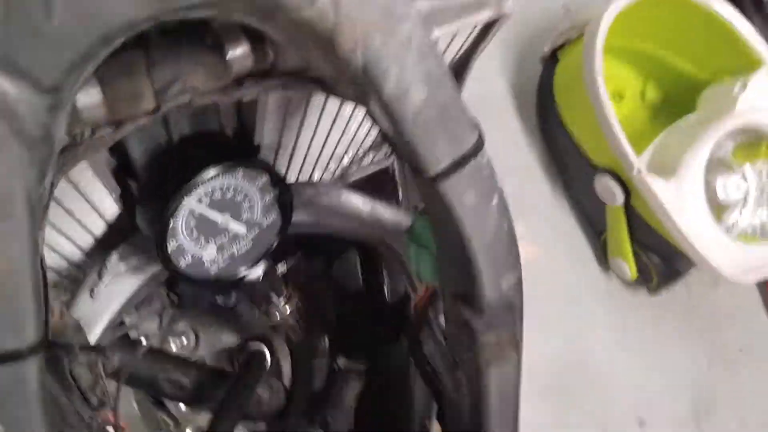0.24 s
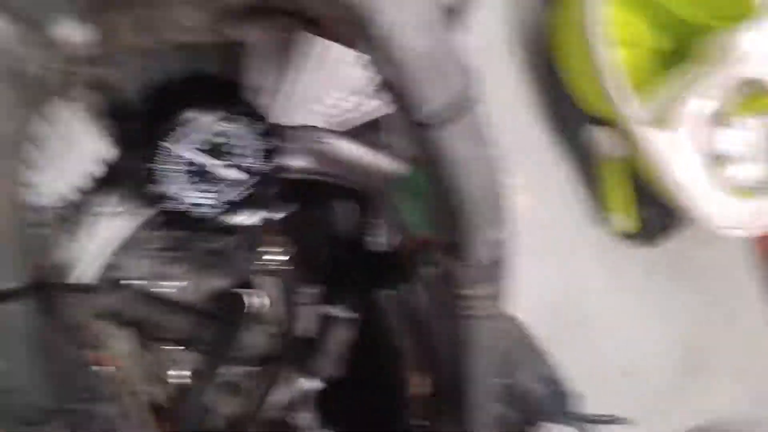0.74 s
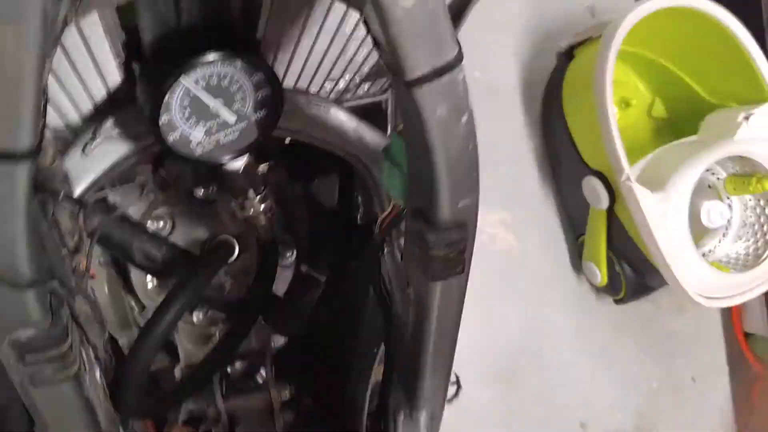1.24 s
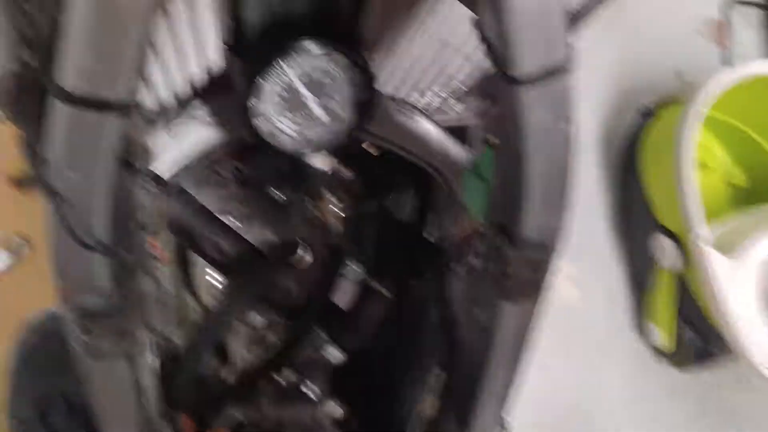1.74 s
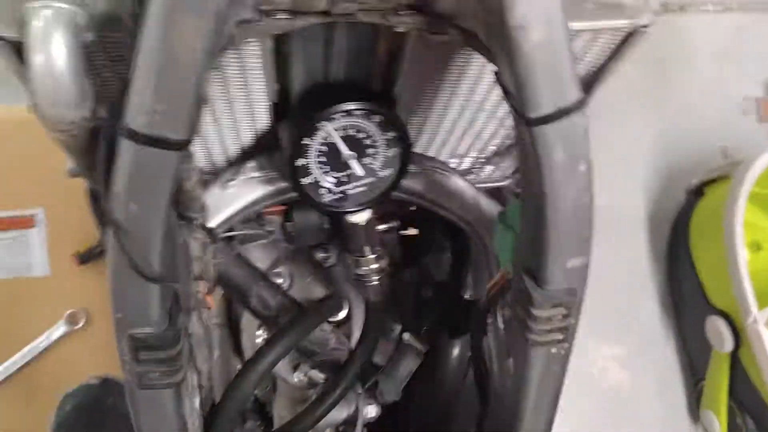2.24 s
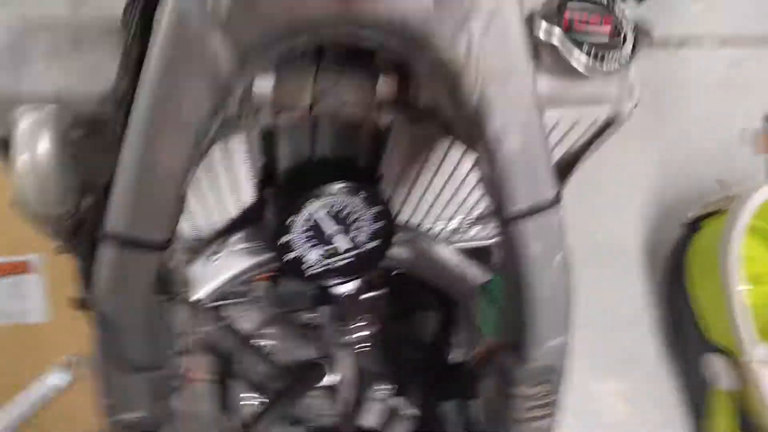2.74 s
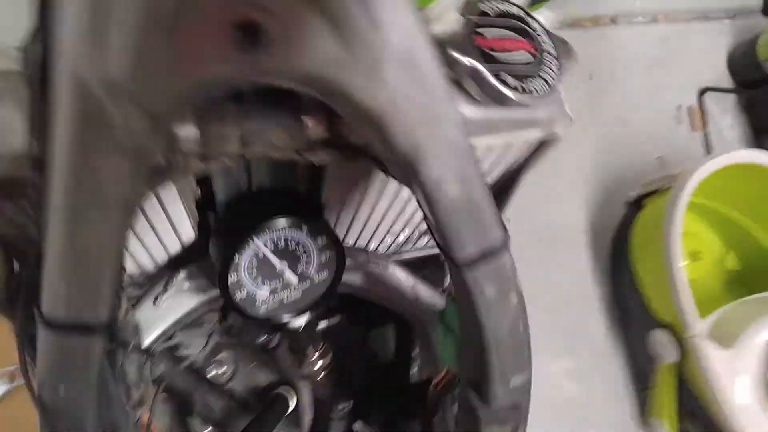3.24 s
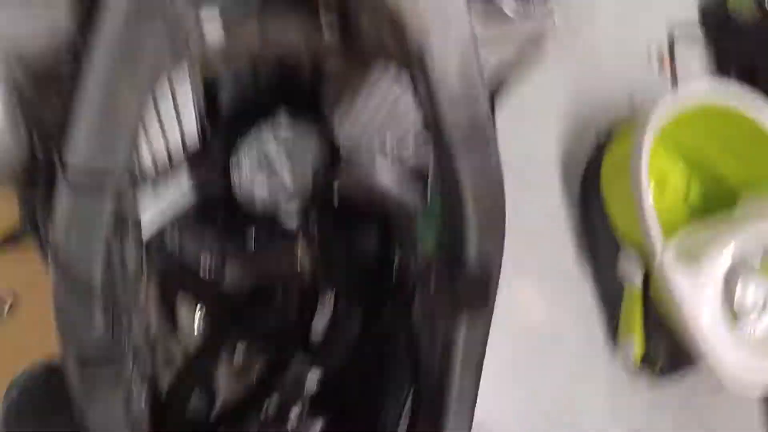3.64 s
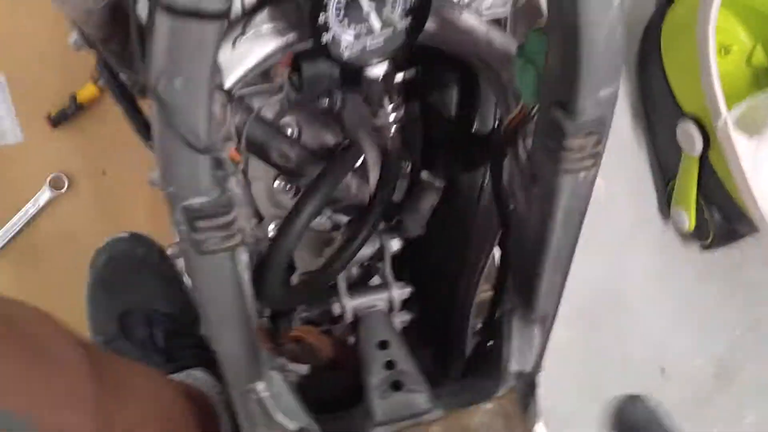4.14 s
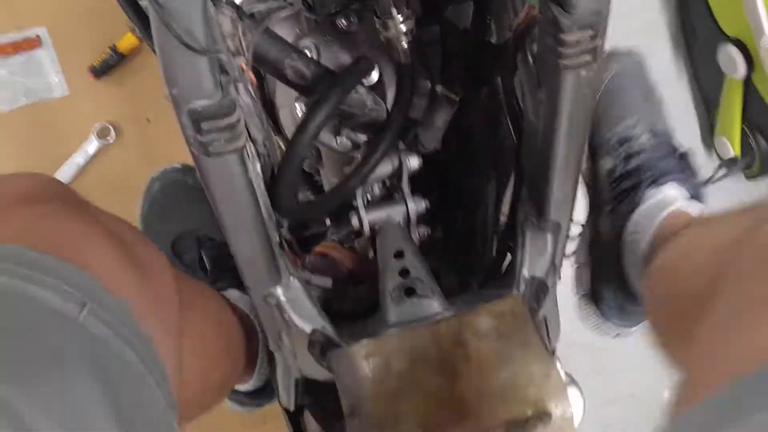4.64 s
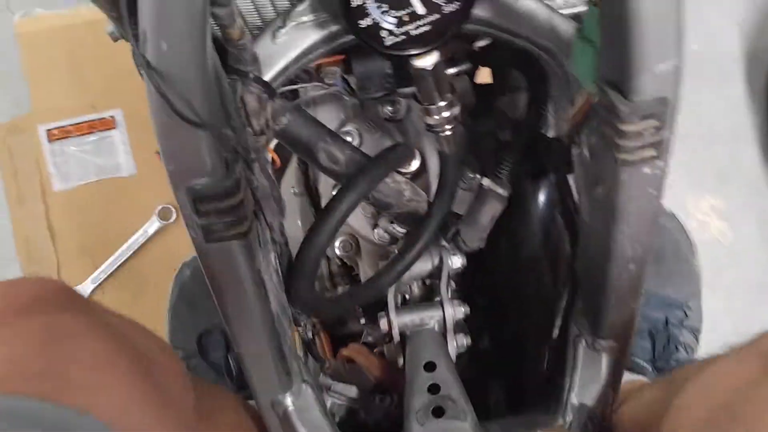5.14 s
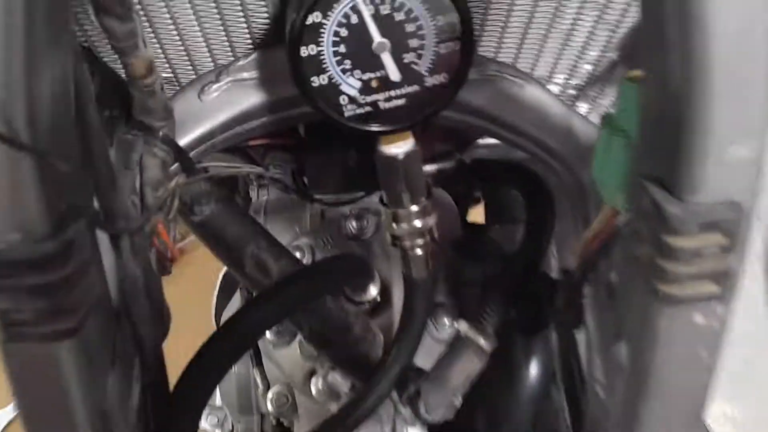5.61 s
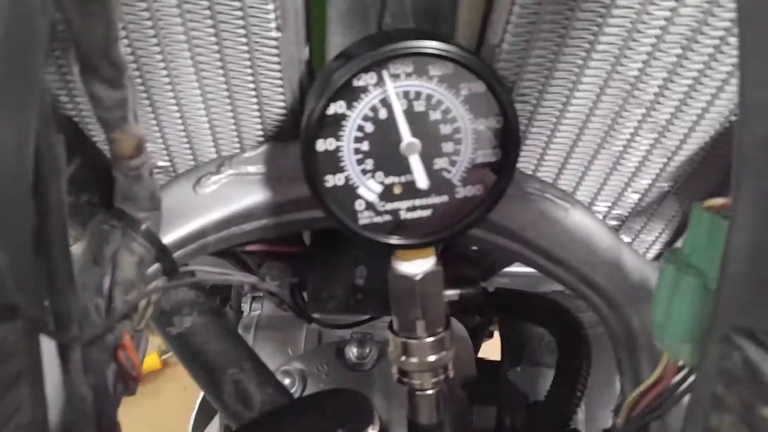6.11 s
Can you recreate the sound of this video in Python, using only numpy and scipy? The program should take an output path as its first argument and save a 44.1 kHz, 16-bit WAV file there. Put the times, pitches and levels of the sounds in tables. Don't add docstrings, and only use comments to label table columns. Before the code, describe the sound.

Close above a motorcycle engine in a hard, echoing garage, a kick lever is stamped seven times at a steady pace. Each stroke brings a gritty gear whirr, alloy knocks, quick hollow puffs from the exhaust and a bright steel clank, then ratcheting as the lever swings back. The engine never catches. Afterwards rubber soles thud, scuff and squeak, and the room falls nearly silent with a few tiny clicks.

```python
import sys
import numpy as np
from scipy import signal
from scipy.fft import rfft, irfft, next_fast_len
from scipy.io import wavfile
from scipy.ndimage import uniform_filter1d, minimum_filter1d

SR = 44100
rng = np.random.default_rng(int(sys.argv[2]) if len(sys.argv) > 2 else 0)


def how_loud(loudness_db):
    steps = np.asarray(loudness_db, float) / 20
    return 10 ** steps


def materialize(psi):
    bounded = np.clip(np.atleast_2d(psi).T, -1, 1)
    quanta = np.round(bounded * 32767).astype(np.int16)
    wavfile.write(sys.argv[1], SR, quanta)


N = 280917
SIZE = next_fast_len(N + 2 * SR)
HZ = np.maximum(np.arange(SIZE // 2 + 1) * SR / SIZE, 1)
TIME = np.arange(N) / SR
BLOW_TIME = np.arange(int(.3 * SR)) / SR


def on_hz(table, hz=HZ):
    f, v = np.transpose(table)
    return np.interp(np.log(hz), np.log(f), v)


def on_time(table):
    s, *columns = np.transpose(table)
    return [np.interp(TIME, s, c) for c in columns]


def unit(x):
    return x / np.sqrt(np.mean(x ** 2))


def band(x, lo_hz, hi_hz):
    return signal.sosfilt(signal.butter(2, [lo_hz, hi_hz], "bandpass", fs=SR, output="sos"), x)


def noise():
    return rng.standard_normal(N)


def walk(rate):
    k = int(SR / rate)
    held = np.repeat(rng.standard_normal(N // k + 1), k)
    return 1.43 * uniform_filter1d(uniform_filter1d(held, k), k)[:N]


def peak(s, db, rise_db_s, fall_db_s):
    t = TIME - s
    return db - np.maximum(-rise_db_s * t, fall_db_s * t)


def ring(modes, chance, push_s, detune, scatter_db, skew, turn=np.pi):
    hz, db, t60 = np.transpose(modes)[:, :, None]
    t = BLOW_TIME
    a, b, c = chance[:3 * len(modes)].reshape(3, -1, 1)
    phase = turn * np.arange(len(modes))[:, None] + skew * c
    waves = how_loud(db + scatter_db * a) * np.sin(2 * np.pi * hz * (1 + detune * b) * t + phase)
    decay = np.exp(-np.log(1000) * t / t60)
    y = np.sum(waves * decay, axis=0) * np.minimum(t / push_s, 1)
    return y / np.abs(y).max()


def add(out, s, sound):
    i = int(s * SR)
    out[..., i:i + sound.shape[-1]] += sound[..., :N - i]


def causal(db):
    cep = irfft(np.log(how_loud(db)), SIZE)
    cep[1:SIZE // 2] *= 2
    cep[SIZE // 2 + 1:] = 0
    return np.exp(rfft(cep))


# f/Hz, coherence/1
ALIKE = [(60, 1), (130, 0.97), (290, 0.97), (640, 0.81), (1410, 0.4), (3100, 0.5), (6820, 0.05),
         (15000, 0.4)]


def ports(a, b):
    c = np.clip(on_hz(ALIKE), 0, 1)
    mid, side = np.sqrt(1 + c) * a, np.sqrt(1 - c) * b
    return np.array([mid + side, mid - side]) / 2


# f/Hz, level/dB
LEAN = [(60, 0), (110, 1), (200, 1), (380, 2), (700, 1.5), (1290, 6.5), (2380, 2.2), (4400, 5.3),
        (8120, 3.5), (15000, -0.5)]
# f/Hz, phase/rad
LEAD = [(100, -0.18), (1030, 0.39), (2760, 0.66), (4700, 1.3), (5500, 1.5), (6300, -1.8), (8870, 2.26),
        (10100, 1.5), (16000, 0.99)]


def port_sides():
    lean = how_loud(on_hz(LEAN) / 2) * np.exp(1j * on_hz(LEAD) / 2)
    return np.array([lean, 1 / lean])


# f/Hz, spectral density/dB
FLOOR_TONE = [(15, -47.5), (30, -22), (64, -16.5), (128, -15), (230, -17.5), (400, -29.5), (510, -57),
              (691, -21), (9020, -51.5), (15000, -47)]


def room_tone():
    diffuse = ports(*rfft(rng.standard_normal((2, SIZE))))
    tone = irfft(port_sides() * diffuse * how_loud(on_hz(FLOOR_TONE)), SIZE)[:, :N]
    return unit(tone) * how_loud(-63.5)


def mains_hum():
    return how_loud(-70.0) * np.sin(2 * np.pi * 120 * TIME) + how_loud(-63.5) * np.sin(2 * np.pi * 60 * TIME)


# f/Hz, T60/s
GARAGE_T60 = [(60, 0.54), (250, 0.84), (700, 0.81), (2000, 0.52), (5000, 0.77), (12000, 0.52)]
# f/Hz, level/dB
GARAGE_DB = [(60, -14.5), (250, -4.5), (700, -2.5), (2000, -5.5), (5000, -3), (12000, -10.5)]


def garage():
    t, tails = np.arange(int(1.4 * SR)) / SR, 0
    for hz in 45 * 2. ** np.arange(9):
        lo_hz, hi_hz = hz / 1.4, hz * 1.4
        tail = band(rng.standard_normal((2, len(t))), lo_hz, hi_hz)
        decay = np.exp(-np.log(1000) * t / on_hz(GARAGE_T60, hz))
        tail *= decay * np.clip((t - .004) / 0.023, 0, 1)
        width = np.sum(band(np.eye(1, 4096)[0], lo_hz, hi_hz) ** 2)
        energy = np.sum(tail ** 2, axis=1, keepdims=True)
        tails = tails + tail * how_loud(on_hz(GARAGE_DB, hz)) * np.sqrt(width / energy)
    frame = rng.standard_normal((2, 2048)) * np.exp(-t[:2048] / .005)
    frame = rfft(frame / np.sqrt(np.sum(frame ** 2, axis=1, keepdims=True)), SIZE)
    apart = np.sqrt(1 - np.clip(on_hz(ALIKE), 0, 1))
    return ports(*rfft(tails, SIZE)) + how_loud(-5.0) * apart * frame


# pawl engages t/s, lever meets stop t/s, blow level/dB, pumped air level/dB, rubbing before it level/dB
KICKS = [
    (-0.05, 0.1037, 2, -14.5, -44),
    (0.606, 0.7511, 3.5, -27, -45),
    (1.29, 1.4942, -2, -21.5, -51.5),
    (1.925, 2.1183, 2.5, -18, -48.5),
    (2.59, 2.77, -0.5, -16.5, -45),
    (3.208, 3.3834, 5.5, -12.5, -41.5),
    (3.826, 4.0393, 2, -17, -48),
]


def pumping():
    lines = []
    for s, stop, _, db, _ in KICKS:
        top_s = stop + 0.014
        lines.append(peak(top_s, db, 22.5 / (top_s - s), 66.5))
    lines.append(peak(5.1, -43, 340, 99))
    return np.max(lines, axis=0)


def hand_shake():
    level_db = pumping()
    shake = unit(band(rng.standard_normal((2, N)), 25, 60)) * how_loud(level_db - 31.5)
    return shake * (level_db > -60)


# t/s, peak level/dB, f/Hz, T60/s
STEPS = [
    (4.428, -42, 132.2, 0.43),
    (4.82, -26.5, 707, 0.1),
    (5.061, -27.5, 328, 0.033),
    (5.471, -44, 299.5, 0.074),
    (6.3, -42, 5540, 0.04),
    (6.32, -49, 224, 0.059),
    (6.323, -47.5, 5570, 0.048),
    (6.353, -43, 339, 0.077),
    (6.356, -43, 5500, 0.072),
]


def footsteps():
    out = np.zeros(N)
    for s, db, hz, t60 in STEPS:
        modes = [(hz, 0, t60), (1.09 * hz, -3, t60)]
        add(out, s, how_loud(db) * ring(modes, rng.standard_normal(12), .9 / hz, .01, 1.5, 1.5))
    return out


# start t/s, end t/s, f/Hz, level/dB, second partial ratio/1, second partial level/dB
SQUEAKS = [
    (4.63, 4.88, 2195, -46.5, 1.2, -4),
    (5.00, 5.07, 1650, -41, 2.0, -8),
    (5.08, 5.28, 2250, -44, 1.17, -3),
    (5.11, 5.2, 2050, -49, 1.6, -3),
    (5.22, 5.32, 3440, -51, .76, -1),
    (5.36, 5.42, 1060, -49, 2.0, -8),
    (5.07, 5.17, 3760, -50, .55, 0),
    (5.58, 5.69, 1250, -56, 1.5, 0),
]


def sole_squeaks():
    out = np.zeros(N)
    for start, end, hz, db, multiple, second_db in SQUEAKS:
        waver = 1 + .004 * walk(250) + .005 * walk(14) - .04 * (TIME - start)
        phase = 2 * np.pi * hz * np.cumsum(waver) / SR
        rise, fall = (TIME - start) / .015, (end - TIME) / (.55 * (end - start))
        gate = np.clip(np.minimum(rise, fall), 0, 1) * how_loud(db + 2.2 * walk(60))
        out += gate * (np.sin(phase) + how_loud(second_db) * np.sin(multiple * phase))
    return out


# peak t/s, level/dB, rise t/s, fall t/s, low edge f/Hz
BRUSHES = [
    (0.53, -41, 0.014, .04, 5000),
    (1.4, -34, .01, 0.017, 6000),
    (1.96, -46, .03, 0.025, 5500),
    (2.555, -33, 0.013, 0.028, 4500),
    (5.655, -48, 0.086, 0.019, 902),
    (6.045, -59, 0.0092, .05, 1295),
    (4.68, -48.5, 0.033, 0.034, 6000),
]


def brushes():
    out = np.zeros(N)
    for s, db, rise, fall, hz in BRUSHES:
        out += unit(band(noise(), hz, 2.0 * hz)) * how_loud(peak(s, db, 9 / rise, 9 / fall))
    return out


# t/s, peak level/dB, low edge f/Hz
PINS = [(0.0214, -27, 6000), (0.5152, -36, 6000), (0.594, -31, 7000), (0.6853, -27, 7000),
        (0.700, -32, 5000), (0.929, -20, 6000), (1.3129, -33, 4000), (1.406, -25, 6000),
        (1.4426, -11.5, 6500), (1.482, -22, 7000), (2.0288, -33, 5000), (2.088, -24, 9100),
        (2.5027, -38, 4000), (2.5361, -27, 6000), (2.6439, -27, 3000), (2.7038, -13.5, 5000),
        (2.7402, -22, 6000), (3.5189, -27, 6000), (3.6641, -37, 6000), (3.756, -26, 6050),
        (5.7178, -51, 1504), (5.734, -50, 1500), (5.778, -54, 2530), (5.819, -53, 1500), (5.976, -54, 2500),
        (5.9877, -33.5, 9500), (6.106, -57.5, 4000), (6.198, -51, 1500), (6.243, -54, 3020),
        (6.2636, -52, 4000), (6.3005, -43, 5000), (6.324, -41, 5000)]


def pin_clicks():
    out, t = np.zeros(N), np.arange(int(.1 * SR)) / SR
    for s, db, hz in PINS:
        click = band(rng.standard_normal(len(t)) * np.exp(-t / .0018), hz, min(3.5 * hz, 16500))
        add(out, s - .0005, how_loud(db + 4.5) * click / np.abs(click).max())
    return out


# middle level/dB, low level/dB, top level/dB
BITE = (-43, -31.5, -37)
# middle level/dB, low level/dB, top level/dB
SPIN = [(-38, -17, -33), (-36, -32.5, -53), (-47, -37, -49)]
SPIN_S = (-.02, .12, .3)
# peak t/s, level/dB, length t/s, brightness level/dB
SCUFFS = [
    (4.456, -39, 0.14, -2),
    (4.936, -49, 0.1, 6.5),
    (5.103, -37.5, 0.098, 9),
    (5.368, -47.5, 0.12, 1),
    (5.656, -62, 0.15, -1),
    (6.053, -57, 0.039, 5.5),
    (6.37, -56, 0.18, 1),
]


def effort():
    def rest(s, db):
        return s, db, db - 4, db + 4

    rows = []
    for s, stop, blow_db, _, rest_db in KICKS:
        rows.append(rest(s - .01, rest_db))
        stages = [(s + .04, BITE)] + [(stop + after, levels) for after, levels in zip(SPIN_S, SPIN)]
        rows += [(at, *(np.array(levels) + 0.5 * blow_db)) for at, levels in stages]
    rows += [rest(4.9, -57), rest(4.9 + 0.93, -71)]
    levels = np.array(on_time(rows))
    for s, db, length, bright_db in SCUFFS:
        fall_db_s = 12 / length
        line = peak(s, db, fall_db_s / 0.7, fall_db_s)
        levels = np.maximum(levels, line + bright_db * np.array([[0], [-1], [1]]))
    return levels


def rubbing():
    mid_db, low_db, top_db = effort()
    ticks = (rng.random(N) < 300 / SR) * how_loud(7.8 * np.minimum(rng.exponential(size=N), 2))
    grain = .9 + unit(signal.lfilter([1], [1, -np.exp(-1 / (.004 * SR))], ticks))
    mid_grit = noise() * grain
    out = unit(band(mid_grit, 1300, 3480)) * how_loud(mid_db + 1.0 + 0.65 * walk(50))
    out += unit(band(mid_grit, 1706, 2000)) * how_loud(pumping() - 23.5)
    out += unit(band(noise() * grain, 510, 1060)) * how_loud(low_db - 9.0 + 0.5 * walk(33))
    out += unit(band(noise(), 5100, 11000)) * how_loud(top_db - 5.0 + 0.5 * walk(19))
    return out


def gear_rattle():
    lines = []
    for s, stop, db, _, _ in KICKS:
        lines.append(np.where(TIME > s + .02, peak(stop, 0.5 * db, 38, 163.5), -99))
    drive_db = np.max(lines, axis=0)
    ticks = (rng.random(N) < 600 / SR) * how_loud(3.0 * np.minimum(rng.exponential(size=N), 2.5))
    burst = signal.lfilter([1], [1, -np.exp(-1 / (.0015 * SR))], ticks) * noise()
    bands = unit(band(burst, 1000, 2400)) + how_loud(-1.5) * unit(band(burst, 3100, 5200))
    return bands * how_loud(drive_db - 40.5)


# t/s, peak level/dB, f/Hz
SLAPS = [(0.0518, -16, 1540), (0.6424, -21.5, 1100), (0.6627, -29, 1630), (0.693, -14.5, 1280),
         (0.7183, -18.5, 1120), (1.3244, -7, 2196), (1.3743, -14, 2250), (1.4425, -13, 2930),
         (3.23, -14, 2130), (3.2473, -2.5, 2330), (3.285, -17.5, 1800), (1.479, -12, 1000),
         (2.0303, -34, 1400), (2.051, -19.5, 1560), (2.078, -13.5, 1310), (2.238, -23, 1780),
         (2.3575, -24.5, 1800), (2.6449, -19.5, 1060), (2.7023, -13.5, 1400), (2.907, -25.5, 1780),
         (3.36, -20, 1070), (3.886, -27, 2210), (3.923, -22.5, 1110), (3.937, -24, 1500),
         (3.9558, -19, 2090), (3.992, -15.5, 1420)]


def tooth_slaps():
    out, t60 = np.zeros(N), .03
    for s, db, hz in SLAPS:
        modes = [(hz, 0, t60), (0.92 * hz, -3, t60), (1.2 * hz, -8, 0.54 * t60)]
        add(out, s - .001, how_loud(db - 2.5) * ring(modes, rng.standard_normal(9), .001, .02, 2.3, 2.2))
    return out


# ratio to the knock's pitch/1, level/dB, T60/s
CASES = [(.86, -13, 0.047), (1.0, 1.5, 0.046), (1.132, -10.5, 0.081), (1.398, -1, 0.029)]
# t/s, peak level/dB, f/Hz
HARD = [(0.594, -6.5, 710), (0.687, -20, 665), (0.871, -16.5, 755), (1.077, -21.5, 752),
        (1.231, -32.5, 796), (1.323, 0, 710), (1.405, -6.5, 740), (1.766, -22, 710), (1.831, -21, 724),
        (2.414, -24, 717), (2.604, -5, 820), (2.676, -11.5, 850), (2.703, -18.5, 750), (3.23, -13, 746),
        (3.249, -0.5, 745), (3.755, -25, 784), (3.974, -18, 690), (4.467, -16.5, 860), (4.53, -24.5, 670),
        (5.061, -20.5, 793), (5.478, -24, 689), (6.355, -41, 860)]
# t/s, peak level/dB, f/Hz
SOFT = [(0.386, -18.5, 730), (0.537, -25, 754), (1.062, -21, 760), (1.143, -28, 680), (1.375, -12.5, 770),
        (1.928, -13.5, 742), (2.032, -24.5, 780), (2.504, -19, 756), (3.11, -24, 700), (3.282, -17.5, 730),
        (3.58, -23, 626), (3.669, -30, 705), (3.703, -20, 733), (3.851, -19, 755), (4.281, -18, 646),
        (4.33, -19.5, 700), (4.392, -15.5, 704), (5.775, -41.5, 718)]


def case_knocks():
    out, t = np.zeros(N), BLOW_TIME
    hard_edge_db, soft_edge_db = 6, -2.5
    blows = [(*row, hard_edge_db) for row in HARD]
    blows += [(s + .009, db - 4.5, 1.1 * hz, hard_edge_db) for s, db, hz in HARD[:-1]]
    blows += [(*row, soft_edge_db) for row in SOFT]
    for s, db, hz, edge_db in blows:
        modes = [(m * hz, d, t60) for m, d, t60 in CASES]
        body = ring(modes, rng.standard_normal(12), .003, .015, 1.5, 2.5)
        edge = unit(band(rng.standard_normal(len(t)), 1100, 2900)) / 2
        edge = edge * np.exp(-t / 0.0042) * np.minimum(t / 0.00037, 1)
        add(out, s, how_loud(db - 7.0) * (body + how_loud(edge_db) * edge))
    return out


# f/Hz, level/dB, T60/s
STOP_RING = [(1729, 2, .035), (2200, -13.5, .03), (3204, -3.5, 0.036), (4335, -11, 0.12), (4770, -6, 0.021),
             (6070, -7, 0.064), (7740, -17, .04), (9900, -11.5, 0.022)]


def stop_ring():
    out = np.zeros(N)
    for _, stop, db, _, _ in KICKS:
        add(out, stop + .001, how_loud(db - 8) * ring(STOP_RING, rng.standard_normal(24), 0.0045, 0.0042, 1.5, 2.3))
    return out


# f/Hz, level/dB, T60/s
STEEL = [(3200, -2, .03), (4340, -3, .03), (4750, -2, .02), (5900, -2, .03), (7650, -6, .025)]
# f/Hz, level/dB, T60/s
LEVER = [(1676, -9.5, 0.044), (1800, 1.5, 0.014), (2240, 11, 0.025)]
# f/Hz, level/dB, T60/s
TOP = [(10100, 0, .014), (11000, -4, .012), (12300, -4, .01)]
# t/s, peak level/dB
TEETH = [(0.5931, -20.5), (1.3191, -13.5), (1.928, -22.5), (2.026, -39), (2.0635, -16), (2.501, -28),
         (2.605, -20), (2.758, -18), (3.2288, -17), (3.664, -24), (3.85, -25.5), (3.95, -18),
         (3.9707, -16.5)]
# t/s, peak level/dB, top level/dB
RATCHET = [(0.038, -20.5, -11), (0.405, -22, -10.5), (0.52, -27.5, -5), (0.687, -26.5, 1),
           (0.3548, -21.5, -11), (0.382, -20, -3), (0.9862, -21, -12), (1.06, -20.5, -9.5),
           (1.137, -27.5, -22), (1.4426, -17.5, -8.5), (1.702, -20.5, -7), (1.7654, -17, -8),
           (1.8297, -22.5, -6), (2.3093, -16.5, -3.5), (2.4163, -21.5, -0.5), (3.006, -22, -11.5),
           (3.018, -19.5, -5.5), (3.049, -20, -9), (3.1086, -16, -24), (3.247, -2.5, -7),
           (3.7562, -15, -30), (4.3253, -15.5, -7.5), (4.368, -17, -4.5), (4.391, -12, -4),
           (4.462, -9.5, -3)]
# t/s, peak level/dB, low level/dB, top level/dB
TICKS = [(4.886, -33.5, -18, 1), (4.899, -36, -14, -9), (4.9185, -28, -18, -21.5), (5.0608, -22.5, -12, -6),
         (5.3183, -29, -5.5, -24), (5.4775, -19.5, -3, -5), (6.0363, -54.5, -1.5, -20),
         (6.15, -49, -4, -16.5), (6.2267, -49, -1, -16), (6.301, -49, -7, -21), (6.323, -45, -1, -28.5)]


def steel_clanks():
    out, t = np.zeros(N), BLOW_TIME
    hits = [(stop, db + 0.6, -7.5, -3.5) for _, stop, db, _, _ in KICKS]
    hits += [(*row, -1.5, -17) for row in TEETH]
    hits += [(s, db, -11, top_db) for s, db, top_db in RATCHET]
    hits += TICKS
    for s, db, low_db, top_db in hits:
        c = rng.standard_normal(36)
        chatter_s = 0.0024 + 0.0015 * how_loud(0.083 * db)
        crack = rng.standard_normal((3, len(t))) * np.exp(-(t / chatter_s) ** 0.6) * np.minimum(t / 0.0014, 1)
        mid = .2 * ring(STEEL, c, .001, .04, 2.5, 2.5) + .75 * band(crack[0], 2800, 9000)
        low = 0.3 * ring(LEVER, c[15:], 0.0013, 0.054, 6.0, 2.85) + 2.35 * band(crack[2], 1500, 2700)
        top = 0.54 * ring(TOP, c[24:], 0.0012, 0.024, 2.0, 2.0) + 0.49 * band(crack[1], 9000, 17000)
        add(out, s, how_loud(db + 4.5) * (mid + how_loud(low_db) * low + how_loud(top_db) * top))
    return out


def pumped_air():
    air = unit(band(noise(), 277, 365.4))
    air += how_loud(-9.5) * unit(band(noise(), 110, 260))
    air += how_loud(-10.0) * unit(band(noise(), 605, 660))
    return air * how_loud(pumping() - 8.5 + 5.0 * walk(23))


# f/Hz, level/dB, T60/s
PIPE = [(250, 3.5, .045), (312, -1, .19), (346, -2, .17)]
# f/Hz, level/dB, T60/s
THUMP = [(65.4, 4, 0.04), (117, -14.5, 0.13), (162, -3.5, 0.12), (206, -21, 0.53)]
# f/Hz, level/dB, T60/s
UPPER = [(596.2, -9, 0.11), (665, -6.5, 0.13), (756, -4, 0.11), (848, -27, 0.093), (1048, -8.5, 0.14),
         (1460, -4, 0.053), (1918, -4.5, 0.033)]
UPPER_DB = [-12, -6.5, -5, -16.5]
# t/s, peak level/dB, deep thump level/dB
POPS = [(0.0, -7.5, -43), (0.067, 1, -44.5), (0.139, -5.5, -32), (0.264, -11.5, -6.5), (0.644, -5, -9.5),
        (0.715, 2, -22.5), (0.792, -12, -48.5), (0.909, -18.5, -23), (1.334, -14, -6.5), (1.396, 2, -12.5),
        (1.474, -1.9, -25), (1.599, -15.5, -8.5), (1.992, -10, -3.5), (2.079, 1, -30.5), (2.16, -27, -11),
        (2.277, -12.5, -22.5), (2.62, -9, -6), (2.692, 2, -19), (2.778, -3.5, -14.5), (2.91, -14, -7),
        (3.304, -4.5, -8), (3.358, -1.5, -41), (3.437, -11.5, -5.5), (3.586, -12.5, -5), (3.904, -12.5, 1),
        (3.988, -1.5, -12.5), (4.067, -2.5, -22.5), (4.178, -16, 3.5)]
# t/s, peak level/dB
SMALL_POPS = [
    (1.319, -13),
    (2.599, -25.5),
    (1.509, -12.5),
    (1.563, -21.5),
    (1.668, -13.5),
    (3.25, -15.5),
    (3.399, -11),
    (3.636, -19.5),
    (4.262, -17),
]


def exhaust_pops():
    out, t = np.zeros(N), BLOW_TIME
    turns = len(UPPER_DB)
    bursts = [(*row, UPPER_DB[k % turns], k % turns == 0) for k, row in enumerate(POPS)]
    bursts += [(*row, -13, -18, False) for row in SMALL_POPS]
    for s, db, deep_db, upper_db, slow_turn in bursts:
        c = rng.standard_normal(60)
        pop = ring(PIPE, c, .0008, .008, .8, .15)
        if slow_turn:
            pop = pop * np.exp(-t / 0.016) * how_loud(4.5)
        pop = pop + how_loud(deep_db) * ring(THUMP, c[15:], 0.0046, 0.058, 7.6, 0.18, turn=0)
        gas = unit(band(rng.standard_normal(len(t)), 1000, 2400))
        gas = gas * np.minimum(t / 0.002, 1) * np.exp(-t / 0.012)
        pop = pop + how_loud(upper_db) * (ring(UPPER, c[30:], 0.0038, 0.018, 2.8, 1.7) + 0.32 * gas)
        add(out, s + 0.004056, -how_loud(db - 3.5) * pop)
    return out * how_loud(1.6 * walk(45))


# f/Hz, level/dB
MIC = [(20, -39.5), (100, 7.5), (430, 1), (510, -0.5), (590, 5.5), (3000, -1.5), (8500, -3), (9000, -5),
       (9800, -3), (15000, -3.5), (16500, -29.5)]


def scene():
    shoes = footsteps() + sole_squeaks() + brushes() + pin_clicks()
    gears = rubbing() + gear_rattle() + tooth_slaps() + case_knocks()
    lever = stop_ring() + steel_clanks()
    exhaust = pumped_air() + exhaust_pops()
    near = rfft(shoes + gears + lever + exhaust, SIZE)
    heard = irfft(causal(on_hz(MIC)) * near * (port_sides() + garage()), SIZE)[:, :N]
    return heard + hand_shake() + room_tone() + mains_hum()


def top_cut(x):
    return signal.sosfilt(signal.butter(12, 16810, fs=SR, output="sos"), x)


def record(dry):
    ceiling, hold = .86, int(0.0015 * SR)
    gain = minimum_filter1d(ceiling / np.maximum(np.abs(dry).max(axis=0), ceiling), 2 * hold)
    limited = dry * uniform_filter1d(gain, hold)
    cut = signal.ellip(8, .2, 60, 16700, fs=SR, output="sos")
    return top_cut(signal.sosfilt(cut, limited))


dry = scene()
out = record(dry)
materialize(out)
```